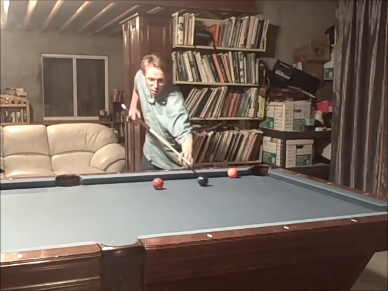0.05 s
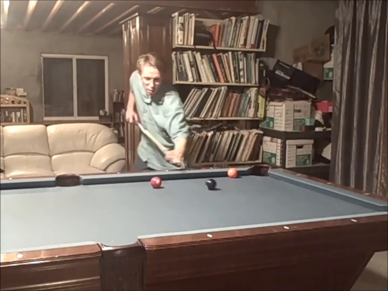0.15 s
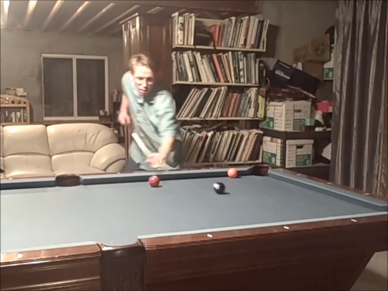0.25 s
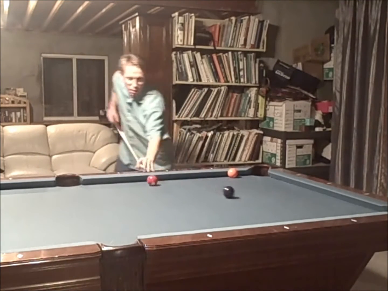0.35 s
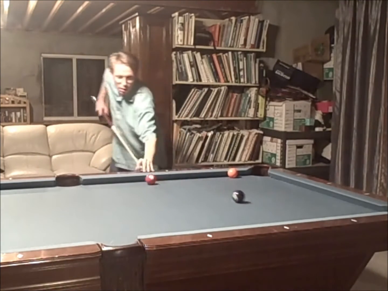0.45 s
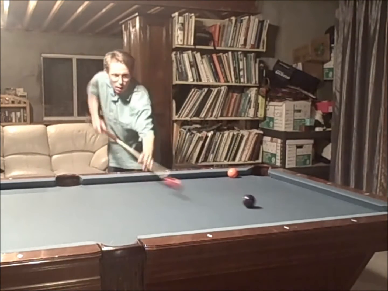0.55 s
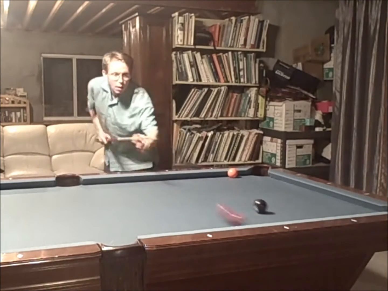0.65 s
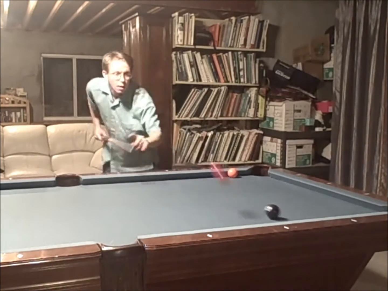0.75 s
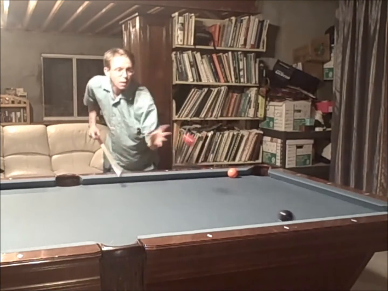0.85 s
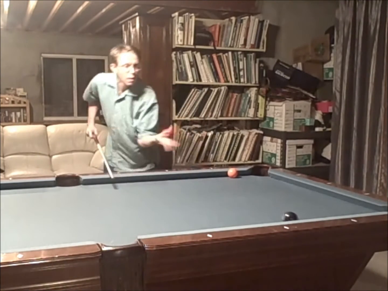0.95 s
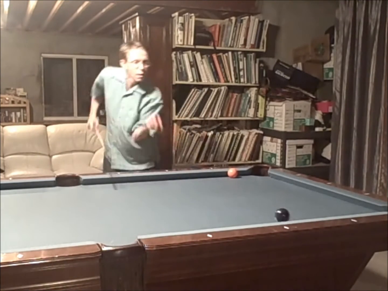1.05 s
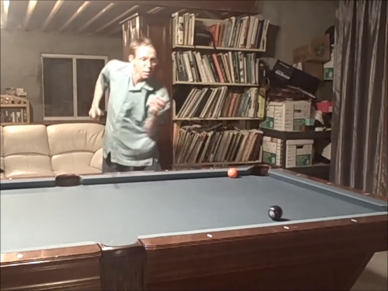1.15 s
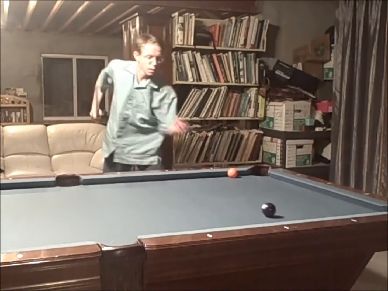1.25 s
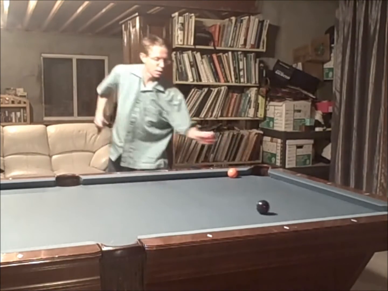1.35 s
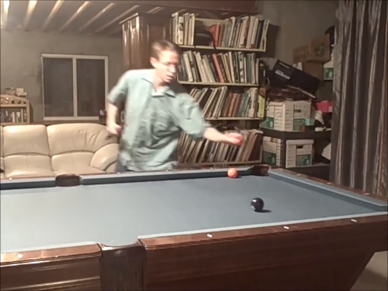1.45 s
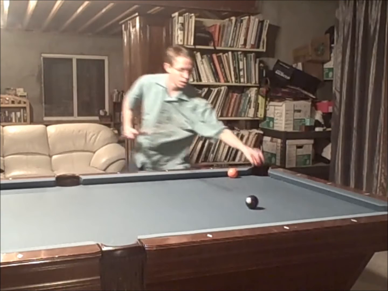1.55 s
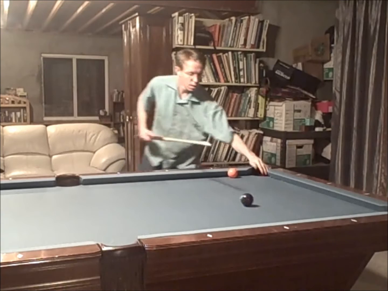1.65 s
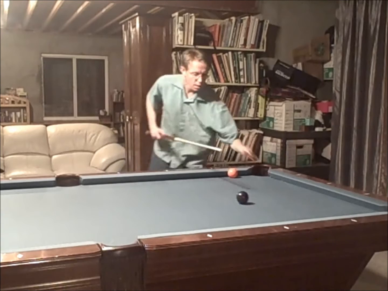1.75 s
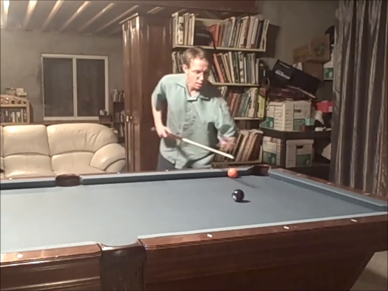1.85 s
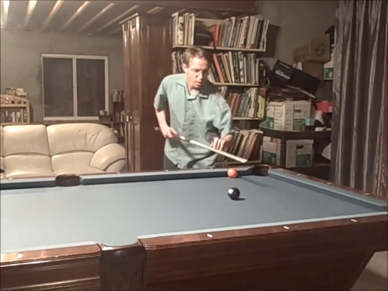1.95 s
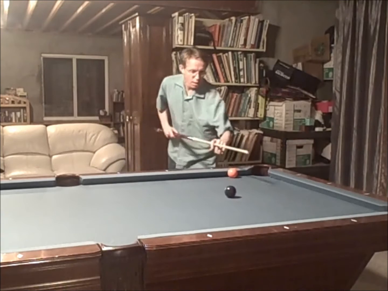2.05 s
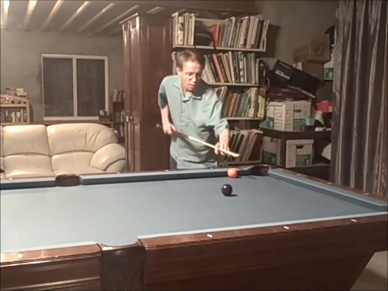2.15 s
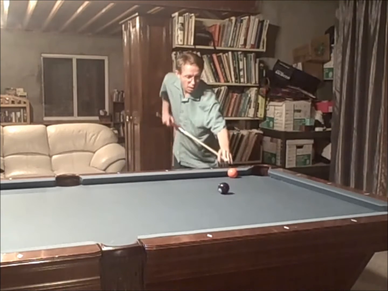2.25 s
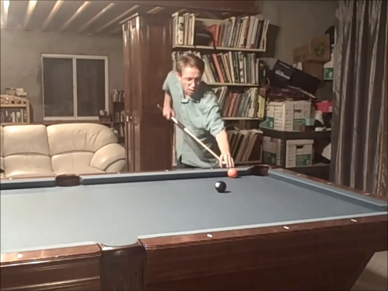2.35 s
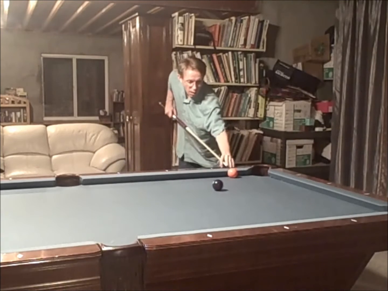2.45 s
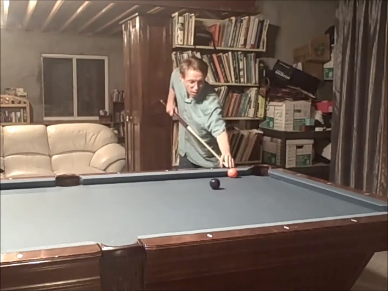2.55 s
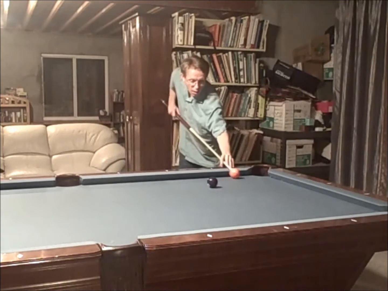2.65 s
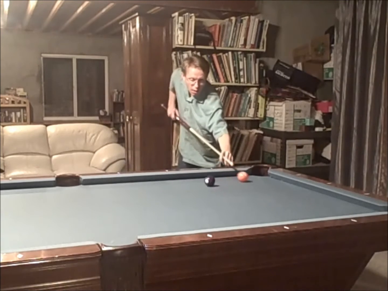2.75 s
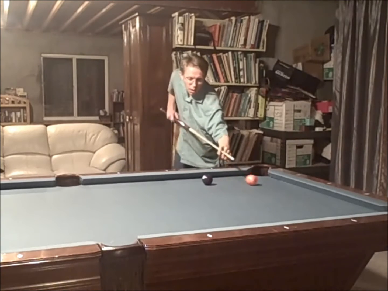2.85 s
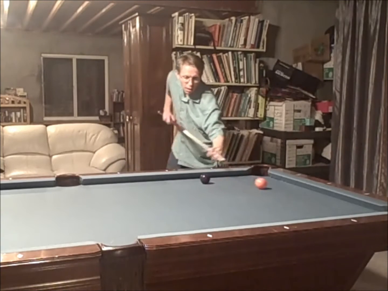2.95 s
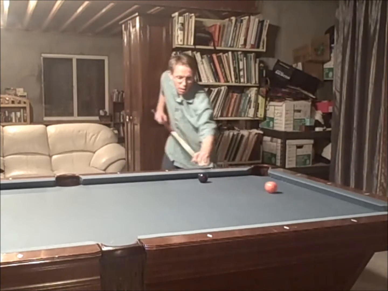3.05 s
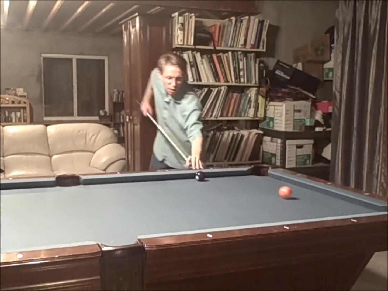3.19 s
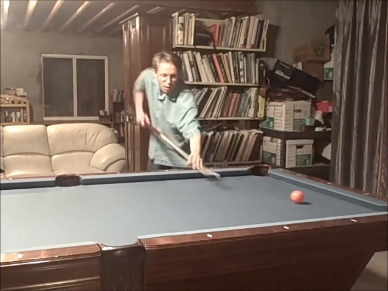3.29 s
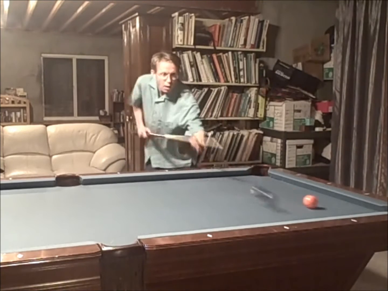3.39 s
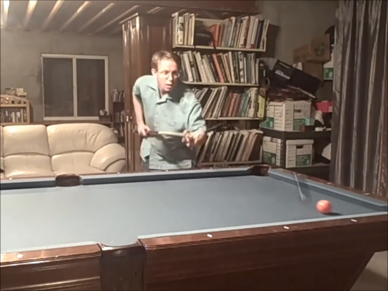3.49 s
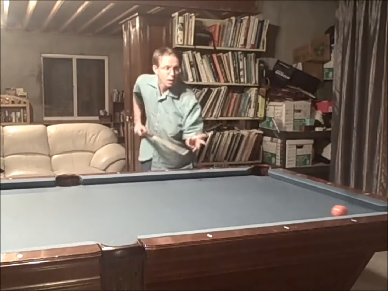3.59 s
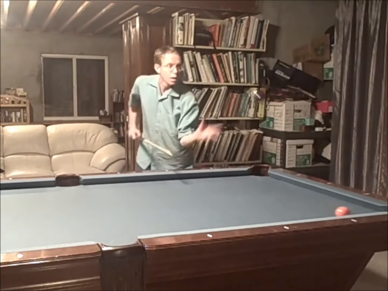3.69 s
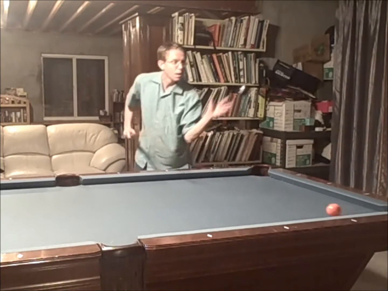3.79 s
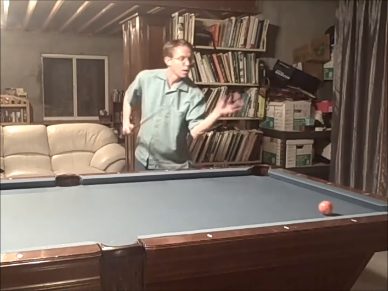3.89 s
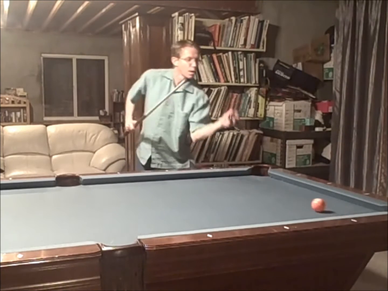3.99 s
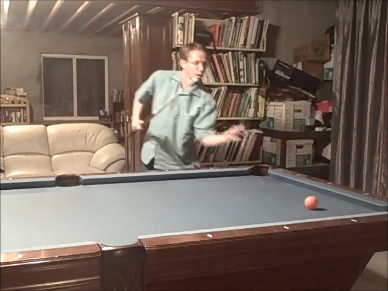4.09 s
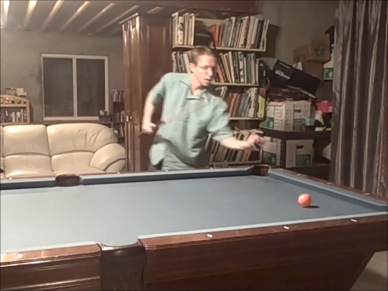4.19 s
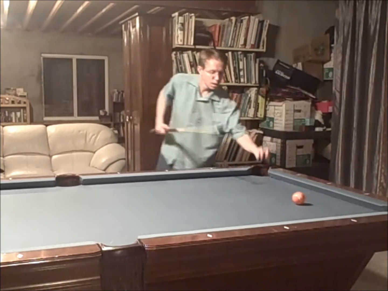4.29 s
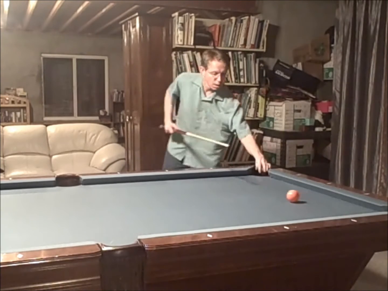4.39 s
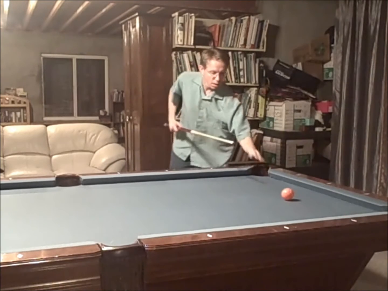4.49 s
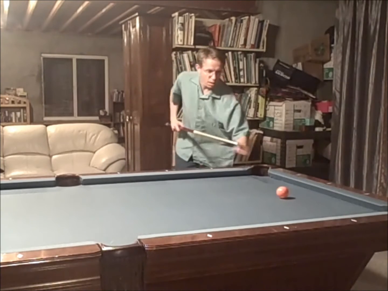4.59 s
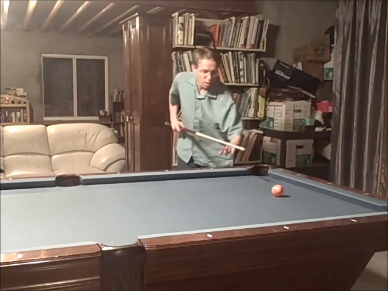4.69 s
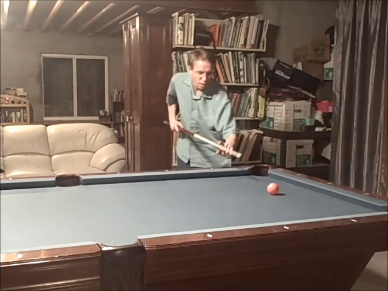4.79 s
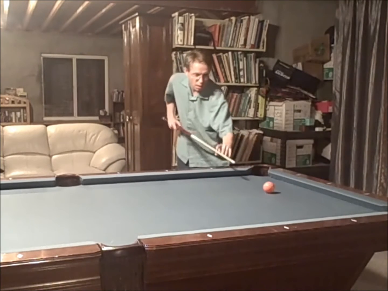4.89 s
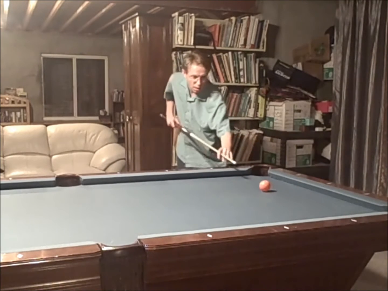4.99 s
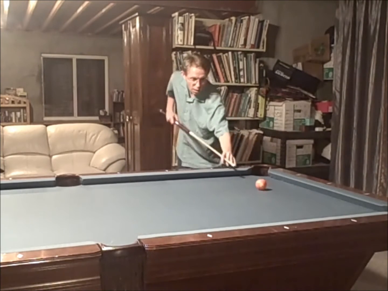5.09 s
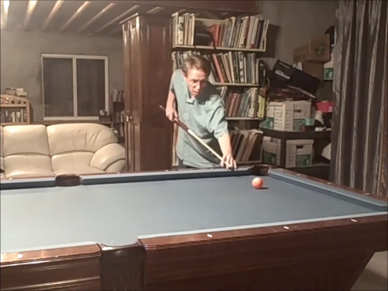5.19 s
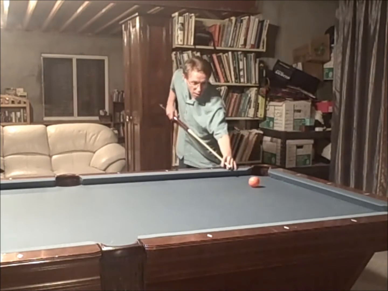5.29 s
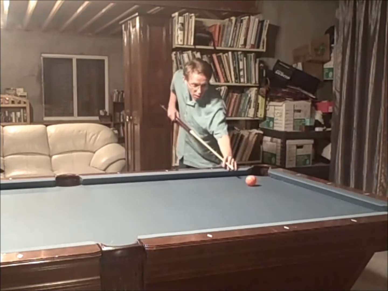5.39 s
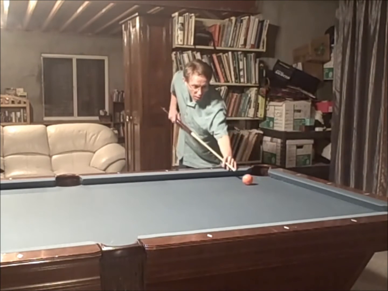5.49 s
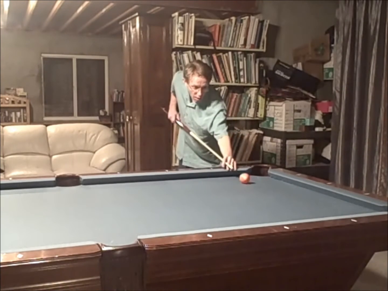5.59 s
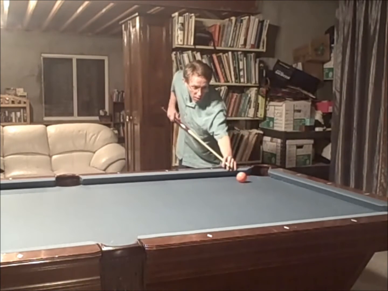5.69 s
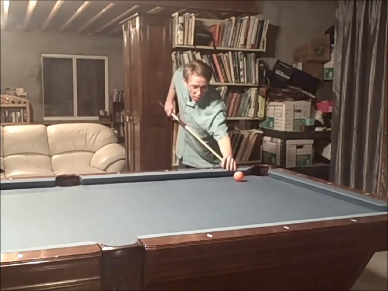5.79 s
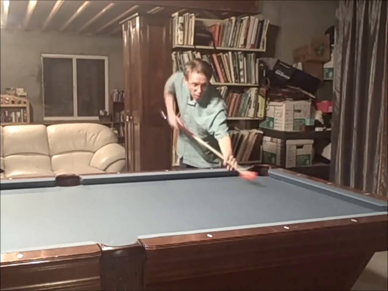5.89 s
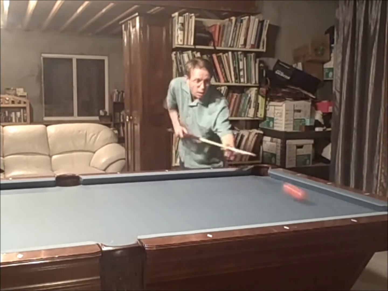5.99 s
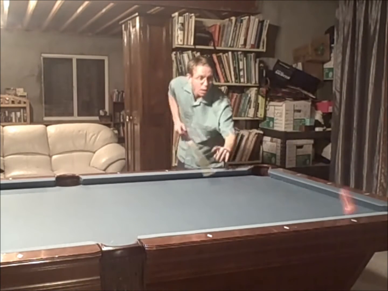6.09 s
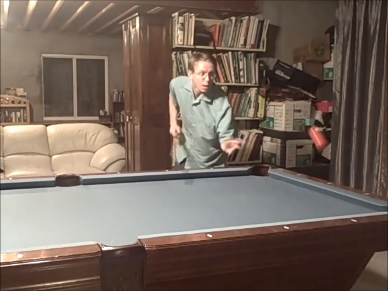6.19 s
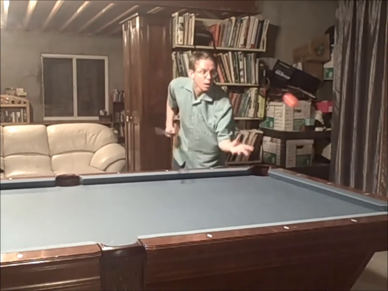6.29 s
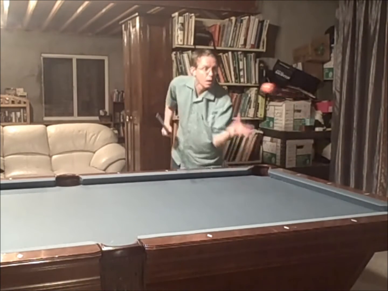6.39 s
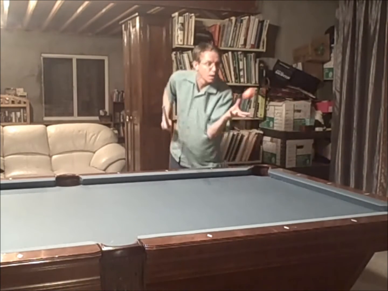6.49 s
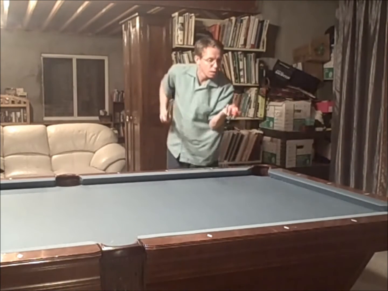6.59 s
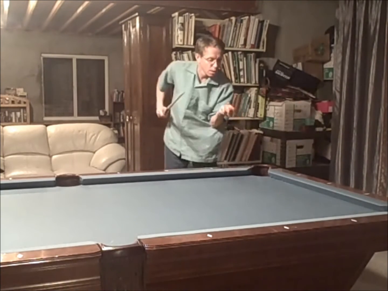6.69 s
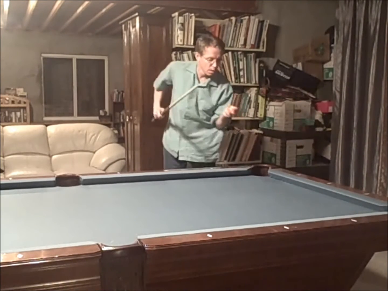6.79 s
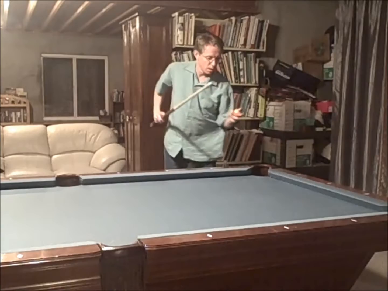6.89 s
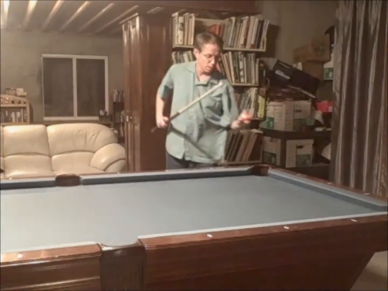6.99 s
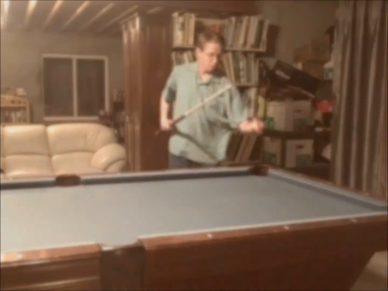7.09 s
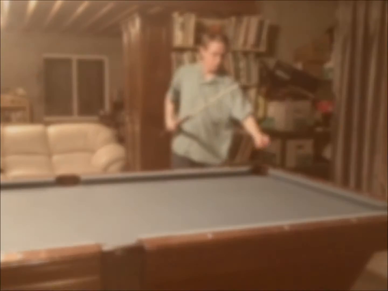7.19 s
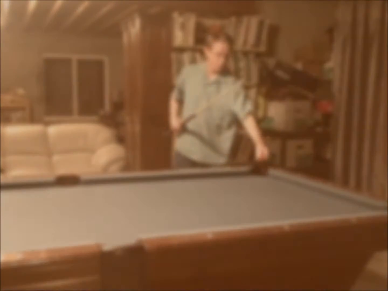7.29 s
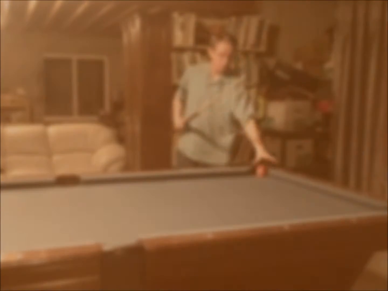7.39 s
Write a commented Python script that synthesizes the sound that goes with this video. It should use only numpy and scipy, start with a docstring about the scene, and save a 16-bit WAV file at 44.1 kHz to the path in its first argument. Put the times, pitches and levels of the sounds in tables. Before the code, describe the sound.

Three sharp pool shots, each thudding off the cushion, with balls clacking and rattling in a pocket between them.

```python
"""A pool cue hits a ball hard three times: trick shots, heard beside the table in a furnished room.
Each time the ball thumps the near cushion, the frame booms, and the ball slaps into the player's palm.
A soft cue tap comes before the first two shots, and after each of them a ball clacks into a pocket.
Every hit is a click, shaped by what is struck and spread by the room. The slate and frame ring on,
cue and sleeve swish, and the ventilation rumbles quietly."""
import sys
import numpy as np
from scipy import signal
from scipy.fft import rfft, irfft
from scipy.io import wavfile
from scipy.ndimage import uniform_filter1d

SR = 44100
rng = np.random.default_rng(int(sys.argv[2]) if len(sys.argv) > 2 else 0)


def pcm_store(signal):
    """Save signal as 16-bit PCM."""
    levels = np.round(np.clip(np.atleast_2d(signal), -1, 1) * 32767)
    wavfile.write(sys.argv[1], SR, levels.astype(np.int16).T)


N = 328545
HIT_SAMPLES = 40960  # room for one hit to die away

# Hard cue strokes. Each row: hit time in seconds, level in dB, swing length in seconds,
# swish level in dB, then two boosted pitches, each a pitch in Hz and a boost in dB.
# The 45 Hz one is a deep, faint thump under the second stroke.
HARD_STROKES = [(0.6737, 35.46, .16, -59, 623.4, 2.8, 2320, 3),
                (3.424, 33.1, .115, -62.5, 1624, 6.3, 45, 11),
                (6.0326, 32.6, 0.066, -74.5, 717, 4.4, 2880, 1.8)]
# The next three tables list hits. Each row: start in seconds, level in dB, bass in dB, treble in dB,
# resonance pitch in Hz, its boost in dB.
SOFT_TAPS = [(.0675, 12.5, 6.5, 1, 276.9, 6.5), (2.8068, 19, -0.5, -5.5, 602, 1)]  # cue on ball
CUSHION_HITS = [(.8390, 23.5, 4, -2, 557, 2.5), (3.6080, 27, -3.5, -2, 1520, 2.5),
                (6.1895, 28.5, -14, -8.5, 272, 14)]  # ball on cushion
FRAME_BOOMS = [(.8640, 28, 2, -1, 186, 6), (3.6380, 24.5, -3, 0, 162.7, 10),
               (6.2600, 19, -1.5, -13, 150, 12.5)]  # the frame as the ball rebounds


def cue_strokes():
    """The leather tip hits the ball hard, bringing out the cue's bright resonances."""
    # The tone of a stroke. Each row: frequency in Hz, level in dB.
    tone = [(30, -28), (90, -23.5), (135, -14.5), (175, -4.5), (470, -3.5), (750, 2), (1600, -3.5),
            (2500, -8.5), (3400, -17.5), (5000, -23), (7400, -30.5), (12000, -30), (15500, -34.5)]
    # The cue's resonances. Each row: pitch in Hz, width in Hz, boost in dB.
    cue_peaks = [(4180, 200, 6.5), (5408, 160, 9), (6460, 350, 8.5), (8200, 290, 11), (9427, 280, 8.5),
                 (11200, 320, 6), (11830, 520, 9.5), (13050, 280, 7.5)]
    bass_db, treble_db = -1, 0
    hits = [(s, db, bass_db, treble_db, *boosts) for s, db, _, _, *boosts in HARD_STROKES]
    return impacts(hits, tone, cue_peaks, grit=1.8, tilt_db=-4,
                   scatter_db=14, scatter_s=0.0057, tail_db=10.5, tail_stretch=0.93)


def cue_taps():
    """The cue nudges a ball with a soft, dull knock."""
    # The tone of a tap. Each row: frequency in Hz, level in dB.
    tone = [(50, -13), (130, -4.5), (300, 0), (800, -0.5), (1200, -6), (1800, -13), (2300, -20.5),
            (3500, -29), (6000, -32.5), (10000, -44), (16000, -46)]
    return impacts(SOFT_TAPS, tone, grit=1.4, tilt_db=0,
                   scatter_db=9, scatter_s=0.0023, tail_db=10.5, tail_stretch=1.05)


def cushion_thumps():
    """The ball thumps into the near cushion."""
    # The tone of the cushion. Each row: frequency in Hz, level in dB.
    tone = [(40, -53), (85, -14), (170, -1), (300, -1), (450, -1.5), (800, 2.5), (1500, -3.5), (2000, -9.5),
            (2900, -17), (3800, -30.5), (7000, -43.5), (16000, -46)]
    return impacts(CUSHION_HITS, tone, grit=2.2, tilt_db=4,
                   scatter_db=11, scatter_s=0.011, tail_db=6.5, tail_stretch=1.177)


def frame_booms():
    """The heavy frame booms as the ball rebounds."""
    # The tone of the frame. Each row: frequency in Hz, level in dB.
    tone = [(50, -17), (100, -13.5), (160, 1.5), (250, -3), (400, -6.5), (900, -20.5), (2000, -45),
            (4000, -47), (16000, -65)]
    return impacts(FRAME_BOOMS, tone, grit=0.34, tilt_db=2,
                   scatter_db=1.5, scatter_s=0.015, tail_db=2, tail_stretch=0.69)


def palm_catches():
    """The ball grazes the fingers, then slaps into the cupped palm."""
    # Catches. Each row: slap time in seconds, level, bass and treble in dB, the fingers' head start in
    # seconds, resonance pitch in Hz, its boost in dB, pitch of a dip in Hz, its (negative) level in dB.
    catches = [(1.1728, -0.5, 11, 8, 0.0021, 2744, 6.5, 9300, -16),
               (4.0822, -5, 7, 1, .0072, 14800, 12, 4360, -11),
               (6.7407, -5.5, -16, -5, .001, 13200, 9, 10800, -22)]
    # The tone of the hand. Each row: frequency in Hz, level in dB.
    tone = [(100, -16.5), (600, -6), (900, -5), (1400, -3), (2500, 3.5), (3800, -1.5), (6500, -4),
            (10500, -4.5), (13000, -4.5), (15500, -9)]
    hits, graze_db = [], -9.5
    for s, db, bass_db, treble_db, lead_s, *peak_and_dip in catches:
        hits.append((s - lead_s, db + graze_db, bass_db, treble_db))
        hits.append((s, db, bass_db, treble_db, *peak_and_dip))
    return impacts(hits, tone, grit=0.9, tilt_db=3,
                   scatter_db=1, scatter_s=0.0065, tail_db=1.5, tail_stretch=1)


def pocket_clacks():
    """A ball clacks on others in a pocket; they rattle, softer and duller with each knock."""
    # Clacks. Each row: start in seconds, level in dB, treble in dB, resonance in Hz, its boost in dB.
    clacks = [(1.8308, 7.5, -2, 3000, 7.5), (1.8840, -3, 7.5, 6950, 15.5), (4.6090, 11.5, -8, 3080, 8),
              (4.6275, 8, -6, 1910, -3), (4.9649, -8.5, -26, 1900, 3), (5.0996, -13, -29, 690, 9)]
    # The tone of balls in a pocket. Each row: frequency in Hz, level in dB.
    tone = [(80, -39), (220, 0.5), (400, -13.5), (700, -3), (1000, -3), (1800, 5.5), (3100, 0),
            (3750, -8.5), (4800, -20), (10000, -27), (15000, -28)]
    # Rattles. Each row: start in seconds, the first knock's level in dB, its treble in dB.
    rattles = [(1.9080, 1, 0), (4.7200, -5, -5.5)]
    count, gap_s, shrink, jitter = 4, 0.039, 0.98, 0.13
    fall_db, dulling_db = 2.1, 4  # per knock
    hollow_hz, hollow_db = 610, 7.7  # the pocket's own resonance
    knocks = list(clacks)
    for start, db, treble_db in rattles:
        gaps = gap_s * shrink ** np.arange(count) * (1 + jitter * rng.uniform(-1, 1, count))
        for n, s in enumerate(start + np.cumsum(gaps) - gaps):
            knocks.append((s, db - n * fall_db, treble_db - n * dulling_db, hollow_hz, hollow_db))
    # A softer knock is a longer contact, so it has more bass.
    bass_per_db, neutral_db = 0.65, 7
    hits = [(s, db, bass_per_db * (neutral_db - db), *rest) for s, db, *rest in knocks]
    return impacts(hits, tone, grit=0.4, tilt_db=2.5,
                   scatter_db=-1.5, scatter_s=0.007, tail_db=0.5, tail_stretch=1)


def frame_ticks():
    """A light, bright tick comes with each boom: the harder the boom, the louder the tick."""
    # The tone of a tick. Each row: frequency in Hz, level in dB.
    tone = [(500, -31), (2500, -12), (6000, 2.5), (9000, -4.5), (15000, -7.5)]
    softer_db, bass_db, treble_db, peak_hz, peak_db = 38.5, 2, -4.5, 4900, 4
    hits = [(s, db - softer_db, bass_db, treble_db, peak_hz, peak_db) for s, db, *_ in FRAME_BOOMS]
    return impacts(hits, tone, grit=0.9, tilt_db=-1.5,
                   scatter_db=-10, scatter_s=0.0057, tail_db=-4, tail_stretch=0.9)


def table_ring(hits, ring_db, tilt_db, rise_s):
    """Slate and frame ring after a hit; soft contact favours low notes (tilt_db is per octave)."""
    # The table's natural notes. Each row: pitch in Hz, level in dB, seconds to fade by 60 dB.
    notes = [(88.6, -17, 0.78), (171.7, 0, 0.39), (233.6, -7, 0.43), (281, 1.5, 0.44), (323, -6, .45),
             (400, -2, 0.39), (613, 3, .45), (764, -4, 0.32), (854, -3.5, 0.31), (920, 0, 0.33),
             (973, -3.5, 0.52), (1190, -4, 0.19), (1525, -5, 0.41), (1625, -3.5, .45), (2054, -11, 0.32),
             (2225, -9.5, .3)]
    out, t = np.zeros(N), np.arange(SR) / SR
    for s, db, *_ in hits:
        ring = np.zeros(SR)
        for hz, note_db, fade_s in notes:
            fade = gain_of(note_db + tilt_db * np.log2(hz / 400) - 60 * t / fade_s)
            ring += fade * np.sin(2 * np.pi * (hz * t + rng.random()))
        add(out, s, gain_of(db + ring_db) * ring * (1 - np.exp(-t / rise_s)))
    return out


def swishes():
    """Cue and sleeve brush softly around each stroke and as the player reaches over the table."""
    # Sleeve brushes between shots. Each row: start in seconds, length in seconds, level in dB.
    reaches = [(2.24, 0.29, -65.5), (4.516, 0.12, -63)]
    # The tone of a swish. Each row: frequency in Hz, level in dB.
    tone = [(300, -16.5), (1500, 4), (4500, -0.5), (8000, -6.5), (14000, -12), (16000, -16)]
    clear_after_s, clear_length_s, clear_db = 0.346, 0.078, -63
    level, moves = np.zeros(N), list(reaches)
    for s, _, swing_s, db, *_ in HARD_STROKES:
        moves.append((s - 2.02 * swing_s, swing_s, db))  # draw back
        moves.append((s - 0.75 * swing_s, swing_s, db))  # drive forward
        moves.append((s + clear_after_s, clear_length_s, clear_db))  # pull clear
    for s, length_s, db in moves:
        swell = np.sqrt(abs(np.hanning(round(length_s * SR))))
        add(level, s, gain_of(db) * swell)
    return level * noise(lambda hz: gain_of(curve(tone, hz)))


def background():
    """Low ventilation rumble, faint blurred fan tones and the thin hiss of the room's air."""
    # The tones of the rumble and the air. Each row: frequency in Hz, relative level in dB.
    rumble_tone = [(15, -17.5), (35, -14), (55, -5.5), (68, -7.5), (95, 2), (125, -2), (170, -10),
                   (230, -20), (330, -30.5), (600, -58.5)]
    air_tone = [(150, -26), (250, 0), (372, -9), (398, -3), (507, -12), (603, -8.5), (882, -15.5),
                (1180, -9.5), (1290, -15), (2760, -20), (15500, -27.5)]
    # Fan tones. Each row: pitch in Hz, width in Hz, level in dB.
    fan_tones = [(605, 12, -77), (690, 30, -79.5)]
    rumble_db, air_db = -49.5, -64
    rumble = gain_of(rumble_db) * noise(lambda hz: gain_of(curve(rumble_tone, hz)))
    fan = sum(gain_of(db) * noise(lambda hz: bump(hz, f, width)) for f, width, db in fan_tones)
    air = gain_of(air_db) * noise(lambda hz: gain_of(curve(air_tone, hz)))
    return rumble + fan + air


def impacts(hits, tone, peaks=(), **path_settings):
    """Each hit (a row as in SOFT_TAPS) is a click shaped by what is struck, then spread by the room."""
    out, hz = np.zeros(N), np.fft.rfftfreq(HIT_SAMPLES, 1 / SR)
    shared_db = curve(tone, hz) + sum(db * bump(hz, f, width) for f, width, db in peaks)
    bass = 1 / (1 + (hz / 400) ** 2)
    treble = 1 / (1 + (2200 / (hz + 1)) ** 2)
    for s, db, bass_db, treble_db, *boosts in hits:
        own_db = db + bass_db * bass + treble_db * treble
        own_db += sum(boost * bump(hz, f, 0.17 * f + 60) for f, boost in np.reshape(boosts, (-1, 2)))
        add(out, s, signal.fftconvolve(click(shared_db + own_db), room_path(**path_settings)))
    return out


def room_path(grit, tilt_db, scatter_db, scatter_s, tail_db, tail_stretch):
    """How a hit reaches the listener: the contact, its echoes, scattered reflections, a fading tail."""
    # The room's tail. Each row: frequency in Hz, seconds to fade by 60 dB (before tail_stretch).
    fade_times = [(80, .75), (170, 0.55), (350, 0.5), (700, 0.46), (1500, 0.45), (3000, 0.35), (6000, .4),
                  (10000, 0.24), (16000, 0.32)]
    # Early echoes from cloth, ceiling and shelves. Each row: delay in seconds, strength as a factor.
    echoes = [(.0035, .5), (.0056, .3), (.0092, .35), (0.026, 0.14)]
    t = np.arange(HIT_SAMPLES) / SR
    hz, when, spectrum = signal.stft(rng.standard_normal(HIT_SAMPLES), SR, nperseg=256)
    fade = gain_of(-60 * when / (tail_stretch * curve(fade_times, hz)[:, None]))
    tail = signal.istft(spectrum * fade, SR, nperseg=256)[1][:HIT_SAMPLES]
    tail *= 1 - np.exp(-t / 0.0021)
    reflections_per_s = 4000  # off rails and furniture
    scatter = rng.standard_normal(HIT_SAMPLES) * (rng.random(HIT_SAMPLES) < reflections_per_s / SR)
    scatter *= t * np.exp(-t / scatter_s)
    # The surfaces scrape as they grip; more grit makes that louder and longer.
    scrape = rng.standard_normal(HIT_SAMPLES) * np.exp(-t / (grit * 0.00053))
    contact = unit_level(unit_level(t == 0) + grit * unit_level(scrape))
    # A leather tip starts dull; a slap or a clack sends its treble straight ahead.
    octaves = np.log2((np.fft.rfftfreq(HIT_SAMPLES, 1 / SR) + 400) / 2900)
    contact = signal.fftconvolve(contact, click(tilt_db * octaves))[:HIT_SAMPLES]
    path = contact + gain_of(tail_db) * unit_level(tail) + gain_of(scatter_db) * unit_level(scatter)
    for delay_s, gain in echoes:
        add(path, delay_s, gain * contact)
    # Many paths together favour no broad range of pitch, so even out the tone.
    power = uniform_filter1d(abs(rfft(path)) ** 2, size=260)
    flatten = click(-10 * np.log10(power / HIT_SAMPLES + 1e-12))
    return signal.fftconvolve(path, flatten)[:HIT_SAMPLES] / np.sqrt(HIT_SAMPLES)


def click(tone_db):
    """The shortest click that has this tone and makes no sound before it is struck."""
    log_gain = np.log(gain_of(np.concatenate([tone_db, tone_db[-2:0:-1]])))
    spectrum = np.exp(np.conj(signal.hilbert(log_gain)))
    return np.fft.ifft(spectrum).real[:HIT_SAMPLES // 8]


def noise(shape):
    """Steady noise at level 1; shape(Hz) says how strong each frequency is."""
    spectrum = rfft(rng.standard_normal(N)) * shape(np.fft.rfftfreq(N, 1 / SR))
    return unit_level(irfft(spectrum, N))


def bump(hz, centre, width):
    """A smooth peak of height 1 around one pitch."""
    return 1 / (1 + (2 * (hz - centre) / width) ** 2)


def curve(points, hz):
    """Joins (Hz, value) points with lines that run straight on a pitch scale."""
    f, value = np.transpose(points)
    return np.interp(np.log(hz + 1), np.log(f + 1), value)


def gain_of(db):
    """Turns decibels into a factor to multiply by."""
    return 10 ** (np.asarray(db) / 20)


def unit_level(x):
    """Scales a sound to an average (rms) level of 1."""
    return x / np.sqrt(np.mean(x ** 2) + 1e-20)


def add(mix, s, sound):
    """Lays a sound into the mix, starting at s seconds."""
    part = mix[round(s * SR):][:len(sound)]
    part += sound[:len(part)]


def scene():
    """All the hits, the ringing table, the swishes and the quiet room, in one channel."""
    hits = cue_strokes() + cue_taps() + cushion_thumps() + frame_booms()
    hits += palm_catches() + pocket_clacks() + frame_ticks()
    ring = table_ring(HARD_STROKES, ring_db=-58.5, tilt_db=0.3, rise_s=0.0027)
    ring += table_ring(CUSHION_HITS, ring_db=-58.5, tilt_db=-4, rise_s=0.009)
    ring += table_ring(SOFT_TAPS, ring_db=-59, tilt_db=-3.5, rise_s=0.025)
    return (hits + ring + swishes() + background())[None]


def record(dry):
    """The hardest strokes overload the input and are rounded off; then the highest treble is cut."""
    clipped = dry / (1 + dry ** 8) ** (1 / 8)
    treble_cut = signal.firwin(161, cutoff=16050, window=("kaiser", 8), fs=SR)
    return signal.oaconvolve(clipped, treble_cut[None], "same")


dry = scene()
out = record(dry)
pcm_store(out)
```